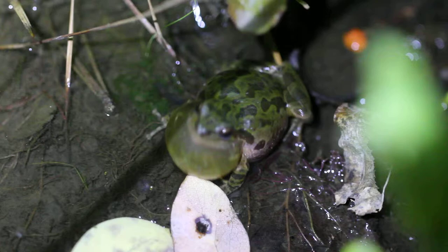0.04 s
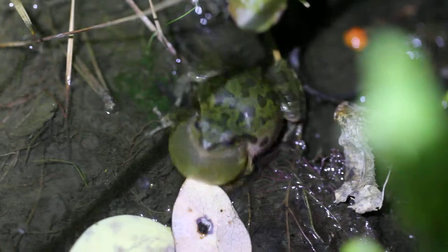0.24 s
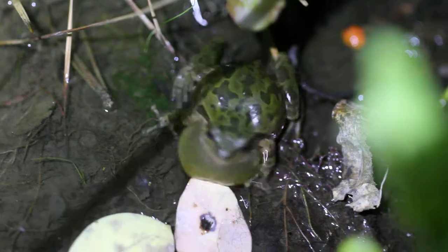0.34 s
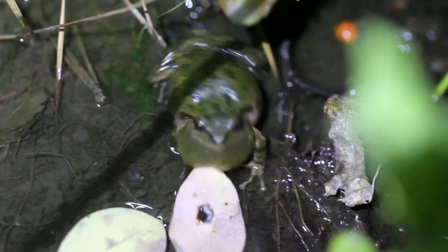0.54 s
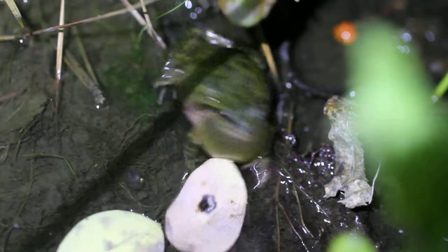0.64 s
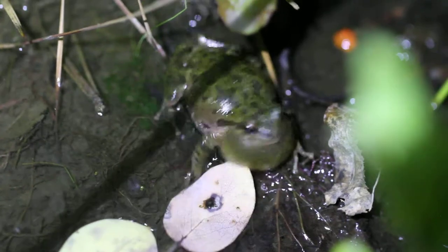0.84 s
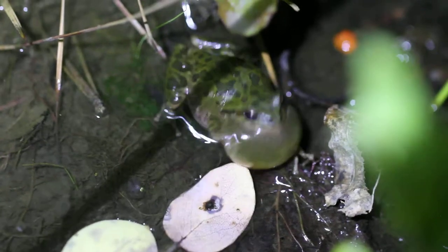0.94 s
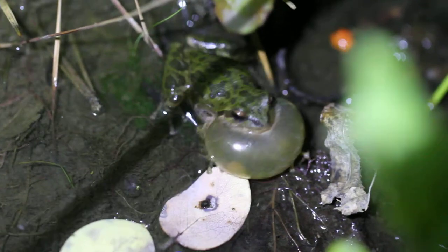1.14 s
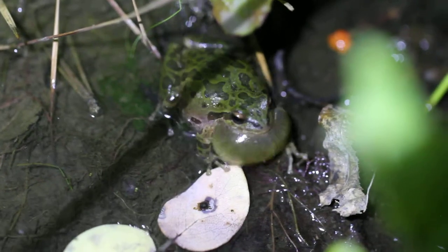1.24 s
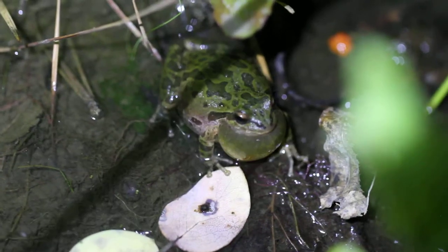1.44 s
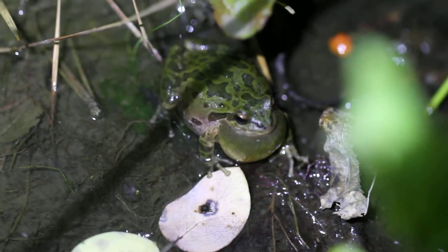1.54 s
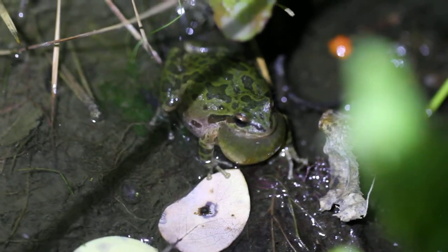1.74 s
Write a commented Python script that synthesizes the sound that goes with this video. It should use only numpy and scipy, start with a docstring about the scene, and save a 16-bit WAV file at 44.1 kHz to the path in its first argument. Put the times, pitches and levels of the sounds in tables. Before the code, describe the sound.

A tree frog close by gives a loud, high, raspy croak at about 0.2 seconds, followed by short rising chirps. A softer croak and chirp near 0.6 seconds lead into a fast rattle from 0.8 to 1.1 seconds, climbing slightly in pitch. More croaks come from 1.2 seconds, ending in a loud rising chirp at 1.5. Very faint distant frogs and a low hush lie underneath.

```python
"""A tree frog close to the microphone, at the edge of a pond at night: two-part calls (a pulsed
croak, then a rising chirp) and one long rattle. Its vocal sac favours the second harmonic;
every pulse starts with a snap of the larynx and carries a thin rasp of air.
The bank throws back short echoes; far frogs and a low hush fill the gaps."""
import sys
import numpy as np
from scipy import signal
from scipy.fft import rfft, irfft
from scipy.io import wavfile
from scipy.ndimage import uniform_filter1d

SR = 44100
rng = np.random.default_rng(int(sys.argv[2]) if len(sys.argv) > 2 else 0)


def master_out(mix):
    """Clip the mix to full scale and print it as 16-bit PCM to the path in sys.argv[1]."""
    frames = np.transpose(np.atleast_2d(mix))
    ceiling = np.clip(frames, -1, 1)
    pcm = np.round(ceiling * 32767).astype(np.int16)
    wavfile.write(sys.argv[1], SR, pcm)


N = 79380
TIME = np.arange(N) / SR
AGE = TIME[:SR // 7]   # time within one note, s


def from_db(db):
    """Decibels to gain."""
    return 10 ** (np.asarray(db) / 20)


def unit_rms(x):
    """Scale to unit rms."""
    return x / np.sqrt(np.mean(x ** 2) + 1e-20)


def curve(rows, s):
    """Every column of a table, read at time s."""
    times, *columns = np.transpose(rows)
    return [np.interp(s, times, c) for c in columns]


def add(out, s, sound):
    """Mix a sound in at time s."""
    i = max(int(s * SR), 0)
    out[i:i + len(sound)] += sound[:max(len(out) - i, 0)]


def butter(x, order, hz, kind="low"):
    """Butterworth filter, low-pass by default."""
    return signal.sosfilt(signal.butter(order, hz, kind, fs=SR, output="sos"), x)


def noise(spectrum, size):
    """Coloured noise of unit rms."""
    hz, db = np.transpose(spectrum)
    bins = np.maximum(np.fft.rfftfreq(size, 1 / SR), 1)
    gain = from_db(np.interp(np.log(bins), np.log(hz), db))
    return unit_rms(irfft(rfft(rng.standard_normal(size)) * gain, size))


def wander(rate_hz, size=len(AGE)):
    """Smooth random motion of unit rms."""
    return unit_rms(butter(rng.standard_normal(size), 2, rate_hz))


def envelope(age, attack, hold, release, opening=0):
    """Linear rise from an opening share; exponential fall once age passes hold."""
    rise = np.clip(age / max(attack, 1 / SR), 0, 1)
    return (opening + (1 - opening) * rise) * np.exp(-np.maximum(age - hold, 0) / release)


# Spectrum of the night air: f/Hz, relative level/dB
HUSH_SPECTRUM = [(30, -28), (70, -11.5), (330, 1), (650, -4), (1600, -13.5), (3100, -16.5), (4200, -11),
                 (4900, -19), (12200, -23.5), (16000, -27.5)]
# Its rise and fall: t/s, level/dB
HUSH_LEVEL = [(0, -59), (.55, -59), (.8, -51.5), (1.0, -69), (1.2, -61.5)]
def night_hush():
    """A low hush all around the pond."""
    return from_db(curve(HUSH_LEVEL, TIME)[0]) * noise(HUSH_SPECTRUM, N)


def pond_reverb(x, t60_s=1):
    """Diffuse tail from the plants and banks around the water."""
    tail = rng.standard_normal(N) * from_db(-60 * TIME / t60_s) * np.minimum(TIME / 0.0067, 1)
    return signal.fftconvolve(x, tail / np.linalg.norm(tail))[:N]


# The far chorus as it reaches the microphone: t/s, level/dB
CHORUS_LEVEL = [(0, -63), (.18, -69.5), (.45, -54), (.6, -56), (.8, -56.5), (1.16, -64), (1.55, -61),
                (1.68, -59.5), (1.8, -68)]
def far_frogs(count=220, pitch_hz=1151, spread=.1, note_s=.012):
    """Many distant chirps at random times and pitches, blurred by the pond."""
    out = np.zeros(N)
    shape = envelope(AGE, note_s / 2, note_s, note_s / 2)
    for when, pitch_draw, size_draw in rng.random((count, 3)):
        phase = 2 * np.pi * pitch_hz * (1 + spread * (2 * pitch_draw - 1)) * AGE
        note = np.sin(2 * phase) + from_db(-12) * np.sin(phase)
        add(out, when * TIME[-1], (.5 + size_draw) * note * shape)
    return from_db(curve(CHORUS_LEVEL, TIME)[0]) * unit_rms(out + pond_reverb(out))


# Reflections off the bank: delay/s, level/dB against the direct sound
ECHOES = [(.0075, -20.5), (.0125, -22.5), (.0205, -33), (.031, -36.5)]
def bank_echoes(frog):
    """The nearby bank throws each call back to the microphone."""
    out = np.zeros(N)
    for delay, db in ECHOES:
        add(out, delay, from_db(db) * frog)
    return out


# Centre of the thin ring over all the near calls: t/s, f/Hz
CALL_RING = [(.26, 10660), (.29, 9710), (.38, 9760), (.83, 10430), (.99, 9900), (1.08, 9150), (1.33, 9340),
             (1.365, 10740), (1.40, 9850), (1.53, 9880)]
# A higher ring that climbs through the rattle: t/s, f/Hz
RATTLE_RING = [(.86, 12100), (.97, 13000), (1.0, 15300)]
def high_ring(calls, centres, gain_db, width_hz=110, linger_s=0.0024):
    """A narrow ring high above the voice follows its loudness and lingers a moment."""
    decay = np.exp(-1 / (linger_s * SR))
    loudness = signal.lfilter([1 - decay], [1, -decay], np.abs(signal.hilbert(calls)))
    phase = 2 * np.pi * np.cumsum(curve(centres, TIME)[0]) / SR
    ring = wander(width_hz / 2, N) * np.sin(phase) + wander(width_hz / 2, N) * np.cos(phase)
    return from_db(gain_db) * loudness ** 1.4 * ring


# Modes of the near frog's throat and sac: f/Hz, relative level/dB, t60/s
THROAT_MODES = [(1023, -7.5, 0.037), (1346, -2, 0.01), (2062, -5, 0.031), (2794, -16.5, 0.027),
                (3394, -15.5, 0.018), (3908, -13, 0.012), (4610, -22.5, 0.0099), (5700, -30, 0.025),
                (6610, -33, 0.028)]
def larynx_snap(low_db_per_octave=0, opening_s=0.00033):
    """The larynx pops open and rings the throat, a little differently each time."""
    modes = np.zeros(len(AGE))
    for k, (hz, db, t60) in enumerate(THROAT_MODES):
        octaves_below = max(np.log2(THROAT_MODES[2][0] / hz), 0)
        struck_db = db + low_db_per_octave * octaves_below + rng.normal(0, 2.26)
        modes += (-1) ** k * from_db(struck_db - 60 * AGE / t60) * np.sin(2 * np.pi * hz * AGE)
    return modes * np.minimum(AGE / opening_s, 1)


# Balance of harmonics 3 to 10: relative level/dB
OVERTONES = [-20.5, -38, -46.5, -51.5, -60, -49.5, -43, -60.5]
# Air rasping through the larynx: f/Hz, relative level/dB
RASP_SPECTRUM = [(700, -19), (1000, 12), (1500, 2), (4200, 1), (5200, -28.5), (6100, -12), (7900, -25),
                 (8900, -7), (10300, -10.5), (11700, -15), (12400, -13.5), (13600, -18.5), (16000, -13)]
def voice(pitch, db, fundamental_db, bright_db, rasp_db, top_hz, jitter=0.016, sac_hz=1012):
    """Unsteady tone with fluttering overtones and a puff of rasp each cycle; louder is brighter."""
    phase = 2 * np.pi * np.cumsum(pitch * (1 + jitter * wander(rate_hz=390))) / SR
    radiated = np.minimum(pitch / sac_hz, 1) ** 16   # the sac radiates little below sac_hz
    tone = from_db(fundamental_db) * radiated * np.sin(phase) + np.sin(2 * phase)
    overtones = sum(from_db(level + bright_db) * (1 + 0.61 * wander(rate_hz=160)) * np.sin(k * phase)
                    for k, level in enumerate(OVERTONES, 3))
    puffs = (1 + .5 * np.sin(phase)) * from_db(rasp_db) * noise(RASP_SPECTRUM, len(AGE))
    rasp = butter(puffs, 4, min(top_hz, .45 * SR))
    force = from_db(db + 7)
    return tone + force ** 0.56 * overtones + force ** 0.36 * rasp


# Croaks at close range: t/s, length/s, level/dB, swell/dB, f/Hz, rise/share of f, pulse period/s,
# extra first gap/s, time to fuse/s, fundamental/dB, pulse attack/s
CROAKS = [(0.2151, .075, -8.5, 7.5, 1009, 0.058, 0.0068, 0.0087, 0.041, -9.5, 0.00055),
          (0.635, 0.073, -19.5, 18, 1075, 0.086, .0076, 0.00034, .085, -17, 0.002),
          (1.2215, 0.045, -20.5, 9, 1036, 0.034, 0.0063, 0.00079, .02, -24, 0.00027),
          (1.355, 0.068, -8, 16, 1013, 0.057, .0068, 0.0015, 0.044, -11, 0.00088)]
def croaks(warble=0.042, fusing_s=0.003, surge_db=4, surge_s=0.0041):
    """Separate snapping pulses swell, then in most croaks fuse with a surge into a warbling tone."""
    out, k = np.zeros(N), np.arange(24)
    for start, length, db, swell_db, hz, rise, period, lag, fuse_s, fundamental_db, attack in CROAKS:
        pulses = period * k + lag * (1 - 0.14 ** k)
        pulse_age = AGE - pulses[np.searchsorted(pulses, AGE, "right") - 1]
        fused = np.clip((AGE - fuse_s) / fusing_s + .5, 0, 1)
        surge = np.exp(-((AGE - fuse_s) / surge_s) ** 2)
        effort_db = surge_db * surge - swell_db * np.maximum(1 - AGE / fuse_s, 0)
        level = from_db(db + effort_db) * envelope(AGE, 0, length, release=0.0024)
        pulsing = envelope(pulse_age, attack, hold=attack + 0.0016, release=0.0025)
        beat = uniform_filter1d(fused + (1 - fused) * pulsing, size=SR // 1500)
        wobble = warble * fused * np.sin(2 * np.pi * pulse_age / period)
        pitch = hz * (1 + rise * np.minimum(AGE / length, 1) + wobble)
        tone = voice(pitch, db, fundamental_db, bright_db=0, rasp_db=-25.5, top_hz=10420)
        add(out, start, level * beat * tone)
        for s in pulses[pulses < length]:
            strength = np.interp(s, AGE, level * (1 - fused) ** 2) * from_db(fundamental_db + 6.5)
            add(out, start + s, strength * larynx_snap(low_db_per_octave=-2.5))
    return out


# Chirps at close range: t/s, attack/s, hold/s, release/s, level/dB, f/Hz, glide/(Hz/s),
# fundamental/dB, snap/dB
CHIRPS = [(0.1965, 0.0013, 0.0011, 0.0014, -45.5, 1060, 6, -9, 8.5),
          (0.295, 0.0011, 0.0028, 0.0056, -12.5, 1064, -5, -34, -9),
          (0.3015, 0.0024, 0.021, 0.0059, -18.5, 1047, 598.5, -25, -30),
          (0.3459, 0.0024, 0.015, 0.0065, -7, 1105, 3002, -15, -4),
          (0.3792, 0.005, 0.005, .001, -16.5, 1112, 2999, -13.5, -12.5),
          (0.387, 0.0015, 0.0022, 0.0087, -18, 1182, 3002.5, -17.5, -19),
          (.7620, 0.0023, 0.012, 0.006, -21, 1146, 5506, -19, -33.5),
          (1.196, 0.0025, 0.0052, 0.0021, -41.5, 978, 3, -15, -6),
          (1.322, 0.0011, 0.011, 0.0024, -17, 1122, 3, -18.5, -23),
          (1.3358, .002, 0.0065, 0.0041, -20.5, 1215, 2, -22, -9),
          (1.4256, 0.0023, 0.0031, 0.0039, -9.5, 1070, -2.5, -11.5, -25),
          (1.4688, 0.0019, 0.0057, 0.011, -28, 1210, 5.5, -13.5, -22.5),
          (1.4840, 0.0099, 0.0086, 0.0073, -3, 1103, 4503, -16, -8)]
def chirps(throb_hz=95):
    """Short, slightly throbbing notes; some hold their pitch, others glide upward."""
    out = np.zeros(N)
    throb = np.sin(2 * np.pi * throb_hz * AGE)
    for start, attack, hold, release, db, hz, glide, fundamental_db, snap_db in CHIRPS:
        pitch = (hz + glide * np.minimum(AGE, hold + 2 * release)) * (1 + 0.011 * throb)
        shape = envelope(AGE, attack, hold, release) * (1 + 0.25 * throb)
        tone = voice(pitch, db, fundamental_db, bright_db=3.5, rasp_db=-30.5, top_hz=11860)
        add(out, start, from_db(db) * (shape * tone + from_db(snap_db) * larynx_snap()))
    return out


# Pulses of the rattle at close range: t/s, level/dB, f/Hz, hold/s
RATTLE_PULSES = [(0.8175, -9, 839, 0.0015), (0.8282, -6.5, 1110, 0.0054), (0.8414, -6.5, 1107, 0.0038),
                 (0.8581, -6, 1185, 0.0031), (0.8719, -6, 1173, 0.0042), (0.8872, -9.5, 1120, 0.00054),
                 (0.9007, -6.5, 1106, 0.0017), (0.9173, -3.5, 1196, 0.004), (0.9435, -3.5, 1205, 0.0033),
                 (0.9661, -4, 1223, .0038), (0.9862, -5, 1223, 0.0031), (0.9982, -5.5, 1258, 0.005),
                 (1.0143, -8, 1254, 0.0055), (1.0313, -7, 1260, 0.0042), (1.044, -7, 1270, 0.0052),
                 (1.0577, -7, 1245, 0.0036), (1.0744, -10, 1285, 0.0028), (1.0876, -4, 1300, 0.0027),
                 (1.1008, -6.5, 1307, 0.0047)]
# They grow rounder and purer: t/s, attack/s, release/s, fundamental/dB, snap/dB, top of the rasp/Hz
RATTLE_TONE = [(.82, 0.00042, 0.0035, -6.5, 1.5, 11700), (.89, 0.00095, .0035, -10.5, -7, 12700),
               (.945, 0.0024, 0.0016, -12.5, -15, 13000), (1.10, 0.003, 0.0032, -13.5, -20.5, 16300)]
def rattle(sag_hz_per_s=9000):
    """A run of short pulses that set in abruptly, swell, and sag in pitch as their pressure is spent."""
    out = np.zeros(N)
    for start, db, hz, hold in RATTLE_PULSES:
        attack, release, fundamental_db, snap_db, top_hz = curve(RATTLE_TONE, start)
        pitch = hz - sag_hz_per_s * np.clip(AGE - hold / 2, 0, 2 * release)
        shape = envelope(AGE, attack, hold, release, opening=0.12)
        tone = voice(pitch, db, fundamental_db, bright_db=-3.5, rasp_db=-25, top_hz=top_hz)
        add(out, start, from_db(db) * (shape * tone + from_db(snap_db) * larynx_snap()))
    return out


def scene():
    """From the water's edge: the near frog and its echoes, over the far chorus and the hush."""
    rattling = rattle()
    calls = croaks() + chirps() + rattling
    rings = high_ring(calls, CALL_RING, gain_db=-33) + high_ring(rattling, RATTLE_RING, gain_db=-40)
    frog = butter(calls + rings, 6, hz=857, kind="high")   # too small to radiate bass
    reflections = bank_echoes(frog) + from_db(-46) * pond_reverb(frog)
    return (frog + reflections + far_frogs() + night_hush())[None]


def record(dry, push_limit=0.95, pull_limit=0.77, cutoff_hz=15900):
    """One microphone rounds the loudest peaks, sooner on the pull than on the push; the top is cut."""
    limit = np.where(dry > 0, push_limit, pull_limit)
    rounded = dry / (1 + (dry / limit) ** 8) ** (1 / 8)
    return signal.sosfilt(signal.ellip(10, .2, 70, cutoff_hz, fs=SR, output="sos"), rounded)


dry = scene()
out = record(dry)
master_out(out)
```